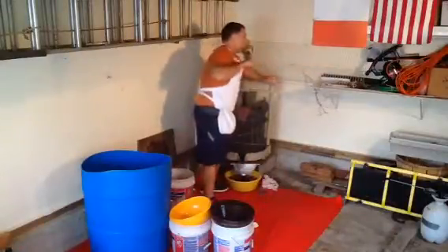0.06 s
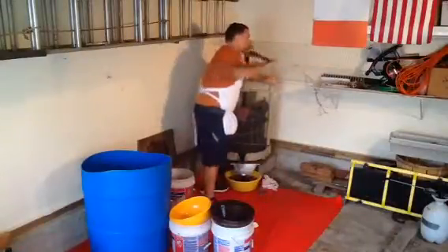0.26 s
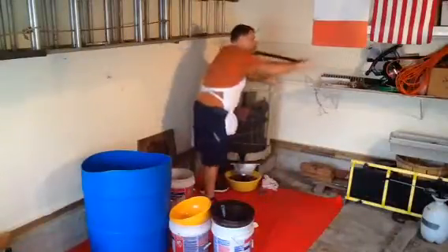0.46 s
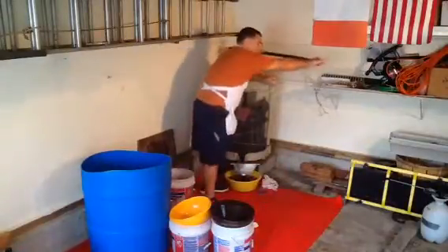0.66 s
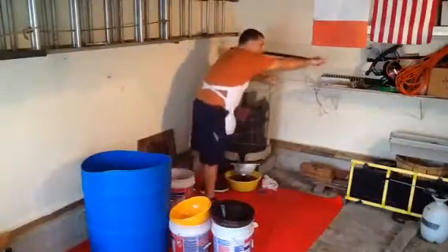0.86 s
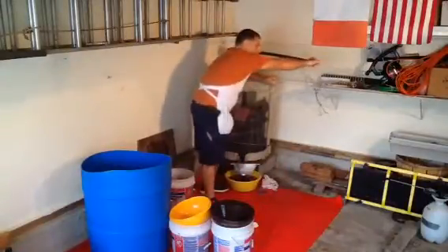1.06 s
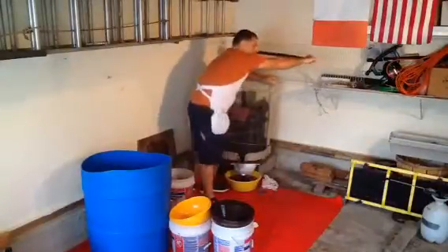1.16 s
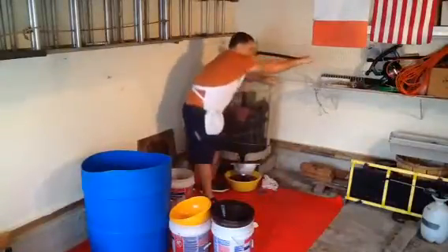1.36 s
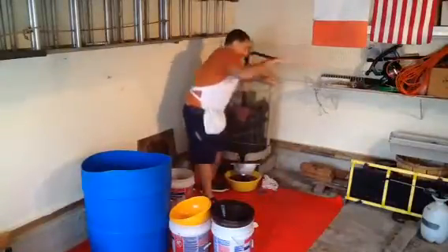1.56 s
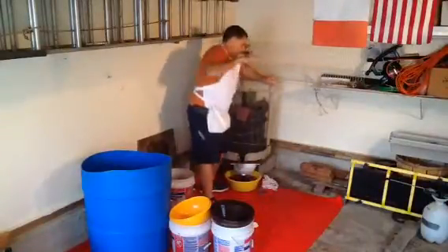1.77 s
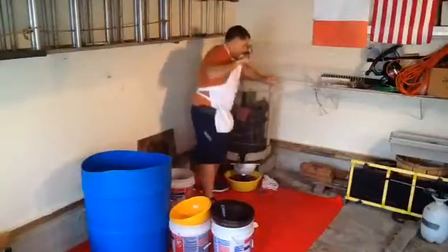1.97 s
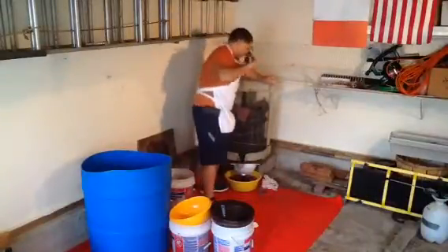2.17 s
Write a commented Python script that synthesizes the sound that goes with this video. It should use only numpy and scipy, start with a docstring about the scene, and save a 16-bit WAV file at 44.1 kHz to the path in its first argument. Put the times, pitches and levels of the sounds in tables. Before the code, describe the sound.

A steel ratchet clacks as a hand press is worked in a garage. Faint handle knocks and a hollow thump at 0.2 seconds lead into two sharp, briefly ringing clacks at about 0.4 and 0.6 seconds, the loudest sounds. Soft knocks follow near 1.2 seconds, a light tick at 1.8, and more knocks at 2.1. Faint rubbing and quiet room noise run underneath.

```python
"""The handle of a hand press is swung back in a hard-walled garage.
It knocks in its socket, the loose frame rattles, and something hollow thumps (0.2 s).
Two steel pawls drop into the ratchet and ring it, one after the other (0.42 s, 0.64 s).
The handle knocks again (1.15 s), a pawl ticks lightly (1.8 s), and last knocks follow (2.1 s).
Faint rubbing goes with the stroke, over quiet room noise."""
import sys
import numpy as np
from scipy import signal
from scipy.io import wavfile
from scipy.ndimage import uniform_filter1d

SR = 44100
rng = np.random.default_rng(int(sys.argv[2]) if len(sys.argv) > 2 else 0)


def store_wav(level_fs):
    """Save 16-bit WAV to argv[1]."""
    pcm = np.round(np.clip(np.atleast_2d(level_fs), -1, 1) * 32767)
    wavfile.write(sys.argv[1], SR, pcm.T.astype(np.int16))


N = 97020

# (time [s], level [dB], tilt [dB/oct], mode gain [dB], note [Hz], note width [Hz], note level [dB])
PAWL_DROPS = [(.4177, -27, 0, 1, 1088, 297, -31.5), (.6448, -25.5, 0.13, 1, 1805, 134, -31)]
# dense ratchet ring (frequency [Hz], relative density [dB])
RATCHET_COLOUR = [(100, -37), (250, -15.5), (740, -10), (920, -3.5), (1180, -6.5), (1450, -5.5),
                  (2450, -8.5), (2690, 1), (2870, -4.5), (3080, -1), (3700, -5), (5000, -7.5),
                  (5900, -12.5), (7200, -11), (10000, -17.5), (15000, -30.5)]
# clear ratchet modes (frequency [Hz], t60 [s], relative level for pawl 1 [dB], for pawl 2 [dB])
RATCHET_MODES = [(988, .3, -42, -48), (1041, .42, -42, -38.5), (1123, .42, -40, -37), (1167, .38, -41, -48),
                 (1301, .35, -48, -42), (1686, .3, -55, -35), (1771, .28, -52, -30), (1817, .3, -41, -50),
                 (2651, .3, -34, -35), (2720, .32, -39, -42), (2810, .3, -41, -43), (2922, .3, -44, -41),
                 (3028, .26, -33, -44), (3082, .36, -44, -36), (3175, .3, -48, -41), (3318, .32, -43, -40),
                 (4365, .32, -44, -46), (4759, .24, -50, -38), (7350, .16, -43, -50)]
# pawl seating just after contact (frequency [Hz], relative density [dB])
SEATING_COLOUR = [(500, -31), (2000, 6), (7500, 9), (15000, -4)]
# light pawl ticks (time [s], level [dB])
PAWL_TICKS = [(1.773, -48.5)]
# tick spectrum (frequency [Hz], relative density [dB])
PAWL_TICK_COLOUR = [(200, -15), (1200, -5), (2000, -6.5), (2500, -1.5), (4100, 0.5), (6000, -6.5),
                    (10000, -11), (15000, -12)]
# handle in its socket (time [s], level [dB], tilt [dB/oct])
HANDLE_KNOCKS = [(0.088, -53.5, -3), (0.103, -55, 1), (1.1443, -54, -1.5), (1.1845, -58.5, -5),
                 (2.1005, -46, 1.6), (2.123, -50, -4), (2.145, -63, 6.5)]
# dense handle ring (frequency [Hz], relative density [dB])
HANDLE_COLOUR = [(100, -39), (200, -8.5), (400, -3.5), (540, -0.5), (720, -7), (1050, 9), (1300, -8.5),
                 (1550, -7), (1780, -6), (2200, -16), (2850, -6), (3400, -18), (3900, -12.5), (4600, -24),
                 (12000, -55)]
# clear handle modes (frequency [Hz], level re knock before tilt [dB], t60 [s])
KNOCK_MODES = [(500, -10, .2), (1020, -5, .2), (1112, -1, .26), (1765, -10, .2), (2830, -9, .18),
               (2960, -9, .18)]
# loose frame shifting under load (time [s], level [dB], pitch [Hz])
FRAME_THUDS = [(0.105, -48, 213), (.106, -48.5, 523), (1.151, -55, 1347), (1.163, -54, 499),
               (1.202, -55.5, 623), (1.243, -59, 544), (2.108, -52, 161), (2.123, -48.5, 199),
               (2.147, -52, 220.5)]
# hollow body (frequency [Hz], level [dB], t60 [s])
HOLLOW_MODES = [(75, -50, .25), (118, -45, .2), (164, -48, .25), (275, -35.5, .38), (323, -36, .14),
                (361, -38, .4), (412, -42, .25), (506, -40, .2), (620, -45, .2), (732, -44, .2)]
# thump spectrum (frequency [Hz], relative density [dB])
HOLLOW_COLOUR = [(50, -17), (80, -9), (200, -4.5), (350, 0.5), (720, -15.5), (880, -21.5), (3000, -32.5),
                 (9000, -65)]
# turning parts (centre [s], half-length [s], pitch [Hz], level [dB], glide [Hz/s])
SQUEAKS = [(.175, .06, 1500, -57.5, 2500), (.275, .09, 1320, -61, 2000), (.35, .06, 1570, -60, 1800),
           (1.358, .02, 2620, -59.5, 0), (1.387, .042, 950, -57, -700), (1.445, .03, 3600, -61.5, 0),
           (1.657, .042, 865, -56, 0), (1.735, .06, 935, -63, 600), (1.87, .1, 935, -62.5, -1200)]
# steel sliding on steel (time [s], level [dB])
STEEL_SCUFFS = [(.362, -64), (.925, -66), (1.209, -59.5), (1.506, -63)]
# dry handle scrape (time [s], level [dB])
SCRAPE_LEVELS = [(0, -63.5), (.3, -62.5), (.41, -59), (.9, -61), (1.08, -62.5), (1.18, -60.5), (1.28, -59),
                 (1.37, -60), (1.59, -62.5), (1.68, -61), (1.95, -63), (2.2, -61.5)]
# scrape spectrum (frequency [Hz], relative density [dB])
SCRAPING_COLOUR = [(300, -1), (1500, 0), (3400, 4.5), (5500, -1), (8000, -3), (15000, -6.5)]
# room noise and hiss (frequency [Hz], relative density [dB])
AIR_COLOUR = [(30, -55), (123, 5.5), (747, -4), (808, -8), (945, 1), (1080, -7.5), (1400, -3.5), (1870, -7),
              (2490, -9.5), (3230, -15), (14300, -21.5), (15500, -27)]
# reverberation (frequency [Hz], t60 [s])
GARAGE_T60 = [(150, 0.54), (500, 0.41), (1100, 0.37), (3000, 0.32), (7000, .35), (14000, 0.24)]

MODE_RISE_S = 0.0014


def pawls(seat_delay_s=0.0035, seat_db=-21, snap_db=14):
    """Each pawl rings the ratchet and seats with a crack; later one snaps lightly over a tooth."""
    out = np.zeros(N)
    for k, (s, db, tilt_db_oct, modes_db, note_hz, width_hz, note_db) in enumerate(PAWL_DROPS):
        clack = blow(RATCHET_COLOUR, t60_s=0.041, direct_db=-3.5, tilt_db_oct=tilt_db_oct, cut_hz=680)
        modes = [(hz, levels_db[k], t60_s) for hz, t60_s, *levels_db in RATCHET_MODES]
        add(out, s, amp(db) * clack)
        add(out, s, amp(modes_db) * ring(modes, MODE_RISE_S))
        add(out, s, amp(note_db) * cluster(note_hz, width_hz, t60_s=0.26))
        add(out, s + seat_delay_s, amp(seat_db) * crack(SEATING_COLOUR, decay_s=0.00074))
    for s, db in PAWL_TICKS:
        add(out, s, amp(db) * blow(PAWL_TICK_COLOUR, t60_s=0.068, direct_db=6))
        add(out, s, amp(db + snap_db) * crack(PAWL_TICK_COLOUR, decay_s=0.0005))
    return out


def handle(pivot_hz=1000):
    """The bar knocks in its socket, each knock at its own level and brightness; the frame rattles."""
    out = np.zeros(N)
    for s, db, tilt_db_oct in HANDLE_KNOCKS:
        knock = blow(HANDLE_COLOUR, t60_s=0.1, direct_db=2.5, tilt_db_oct=tilt_db_oct)
        modes = [(hz, mode_db + tilt_db_oct * np.log2(hz / pivot_hz), t60_s)
                 for hz, mode_db, t60_s in KNOCK_MODES]
        add(out, s, amp(db) * (knock + ring(modes, rise_s=0.0012)))
    for s, db, hz in FRAME_THUDS:
        add(out, s, amp(db) * cluster(hz, width_hz=156, t60_s=0.15))
    return out


def thump(start_s=0.2138, push_hz=365, push_peak_s=0.0062, push_db=-29, blow_db=-40):
    """Soft blow on something hollow: a few strong cycles, then low modes and room."""
    out, t = np.zeros(N), np.arange(SR) / SR
    swell = t / push_peak_s * np.exp((1 - (t / push_peak_s) ** 2) / 2)
    add(out, start_s, amp(push_db) * swell * np.sin(2 * np.pi * push_hz * t))
    add(out, start_s, ring(HOLLOW_MODES, rise_s=0.0074, scatter_cycles=0))
    add(out, start_s, amp(blow_db) * blow(HOLLOW_COLOUR, t60_s=0.032, direct_db=8.5))
    return out


def rubbing(roughness_db=0.5):
    """Friction as the handle is worked: faint squeaks, bright scuffs, dry scrape."""
    out, t = np.zeros(N), np.arange(N) / SR
    for centre_s, half_s, hz, db, glide_hz_per_s in SQUEAKS:
        squeak = fuzzy_tone(hz + glide_hz_per_s * (t - centre_s), width_hz=200)
        swell = np.exp(-2 * ((t - centre_s) / half_s) ** 2)
        out += amp(db) * shaped(squeak, swell)
    for s, db in STEEL_SCUFFS:
        add(out, s, amp(db) * cluster(hz=6200, width_hz=3600, t60_s=0.41))
    noise = rng.standard_normal(N)
    flicker = unit(uniform_filter1d(rng.standard_normal(N), size=300))
    scrape = unit(coloured(noise * amp(roughness_db * flicker), SCRAPING_COLOUR))
    scrape_db = np.interp(t, *np.transpose(SCRAPE_LEVELS))
    return out + amp(scrape_db) * scrape


def reflections(taps_per_s=4400, wash=0.31, build_s=0.0022, hold_s=0.014,
                bass_build_s=0.016, bass_hz=3000, size=256):
    """Garage echoes: taps in a diffuse wash gather, hold and die; bass builds later, lasts longer."""
    t = np.arange(SR) / SR
    taps = rng.choice([-1., 1.], SR) * (rng.random(SR) < taps_per_s / SR)
    echoes = unit(unit(taps) + wash * rng.standard_normal(SR))
    hz, frame_s, spectra = signal.stft(echoes, SR, nperseg=size)
    fall = decay(np.maximum(frame_s - hold_s, 0), lookup(GARAGE_T60, hz)[:, None])
    bass_rise = 1 - np.exp(-frame_s / bass_build_s) / (1 + (hz[:, None] / bass_hz) ** 2)
    tail = signal.istft(spectra * fall * bass_rise, SR, nperseg=size)[1][:SR]
    return tail * rise(t, build_s)


def air(noise_db=-58.5, hum_db=-72.5, lead_in=4096):
    """Steady room noise, microphone hiss and a faint wavering hum."""
    noise = unit(coloured(rng.standard_normal(N + lead_in), AIR_COLOUR)[lead_in:])
    return amp(noise_db) * noise + amp(hum_db) * fuzzy_tone(hz=331.7, width_hz=16)


def blow(colour, t60_s, direct_db, tilt_db_oct=0, cut_hz=20):
    """Short dense ring, thin below cut_hz, plus room, in the struck part's colour."""
    t = np.arange(SR) / SR
    burst = rng.standard_normal(SR) * decay(t, t60_s) * rise(t, rise_s=0.00015)
    direct = signal.sosfilt(signal.butter(4, cut_hz, "high", fs=SR, output="sos"), burst)
    return coloured(amp(direct_db) * direct + reflections(), colour, tilt_db_oct)


def crack(colour, decay_s, size=2048):
    """Bright snap of steel on steel."""
    t = np.arange(size) / SR
    return coloured(rng.standard_normal(size) * np.exp(-t / decay_s), colour)


def ring(modes, rise_s, scatter_cycles=1):
    """Dying sines from (frequency [Hz], level [dB], t60 [s])."""
    out, t = np.zeros(SR), np.arange(SR) / SR
    for hz, db, t60_s in modes:
        phase = 2 * np.pi * (hz * t + scatter_cycles * rng.random())
        out += amp(db) * decay(t, t60_s) * np.sin(phase)
    return out * rise(t, rise_s)


def cluster(hz, width_hz, t60_s):
    """Close modes dying around one note."""
    t = np.arange(N) / SR
    return shaped(fuzzy_tone(hz, width_hz), decay(t, t60_s) * rise(t, MODE_RISE_S))


def fuzzy_tone(hz, width_hz):
    """Noise in one steady or gliding resonance, rms 1."""
    pole = np.exp(-np.pi * width_hz / SR)
    noise = rng.standard_normal(N) + 1j * rng.standard_normal(N)
    wander = signal.lfilter([1], np.poly([pole, pole]), noise)
    carrier = np.exp(2j * np.pi * np.cumsum(hz * np.ones(N)) / SR)
    return unit((wander * carrier).real)


def coloured(x, colour, tilt_db_oct=0, size=4096):
    """Minimum-phase filter of unit energy with the given spectrum."""
    hz = abs(np.fft.fftfreq(size, 1 / SR))
    log_gain = np.log(amp(lookup(colour, hz) + tilt_db_oct * np.log2(hz + 20)))
    response = np.exp(np.conj(signal.hilbert(log_gain)))
    taps = np.fft.ifft(response).real[:size // 2]
    return signal.fftconvolve(x, taps / np.linalg.norm(taps))[:len(x)]


def shaped(tone, envelope):
    """Gives a tone an envelope's shape and energy."""
    return unit(tone * envelope) * np.sqrt(np.mean(envelope ** 2))


def decay(t, t60_s):
    return np.exp(-np.log(1000) * t / t60_s)


def rise(t, rise_s):
    return 1 - np.exp(-t / rise_s)


def amp(db):
    return 10 ** (np.asarray(db) / 20)


def unit(x):
    """Scales to rms 1."""
    return x / np.sqrt(np.mean(x ** 2) + 1e-20)


def lookup(table, hz):
    """Interpolates over log frequency."""
    table_hz, values = np.transpose(table)
    return np.interp(np.log(hz + 1), np.log(table_hz + 1), values)


def add(mix, start_s, sound):
    part = mix[round(start_s * SR):][:len(sound)]
    part += sound[:len(part)]


def scene():
    """All sources, mono."""
    return (pawls() + handle() + thump() + rubbing() + air())[None]


def record(dry, low_cut_hz=60, edge_hz=15300):
    """Steep microphone bass cut, then band limit."""
    thin = signal.sosfilt(signal.butter(8, low_cut_hz, "high", fs=SR, output="sos"), dry)
    lowpass = signal.firwin(401, edge_hz, window=("kaiser", 8), fs=SR)
    return signal.oaconvolve(thin, lowpass[None], "same")


dry = scene()
out = record(dry)
store_wav(out)
```